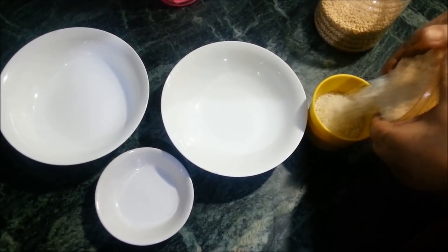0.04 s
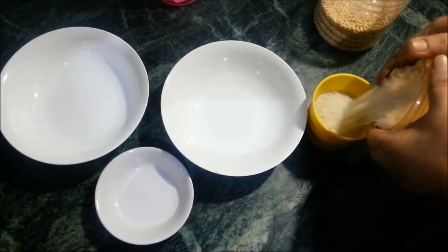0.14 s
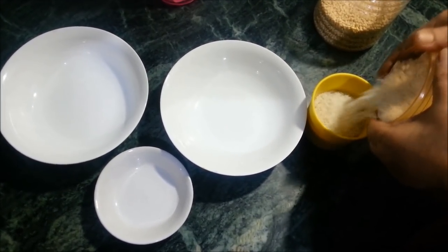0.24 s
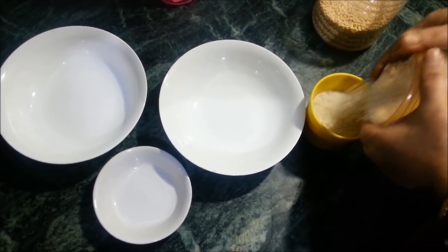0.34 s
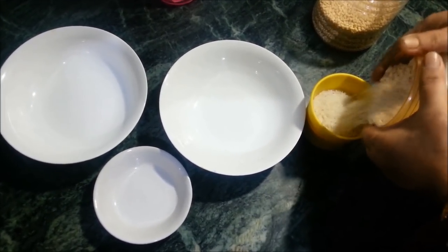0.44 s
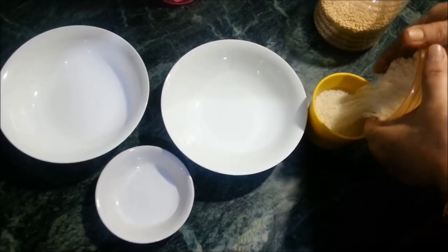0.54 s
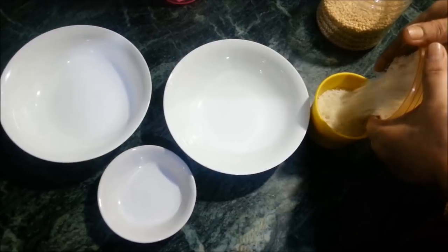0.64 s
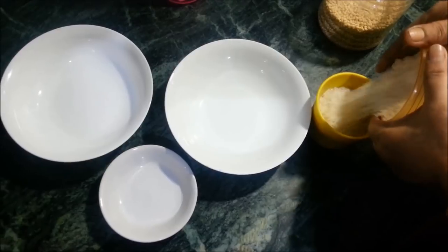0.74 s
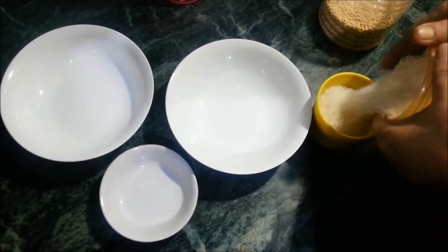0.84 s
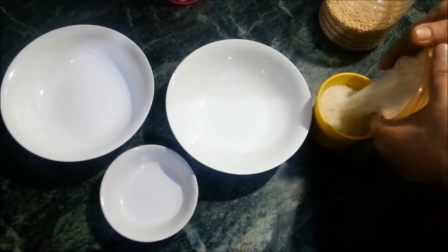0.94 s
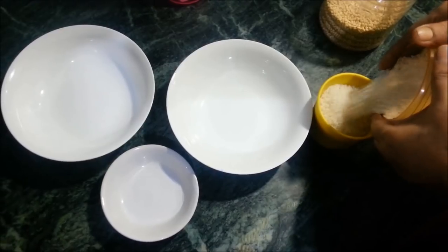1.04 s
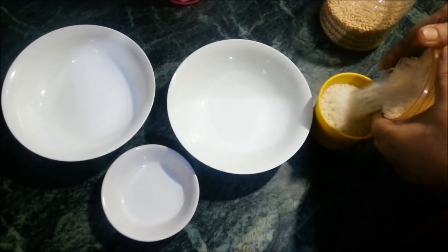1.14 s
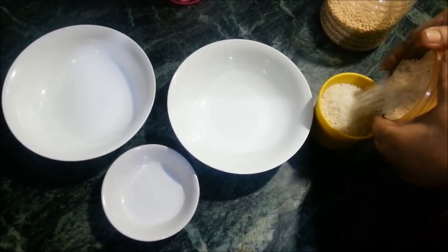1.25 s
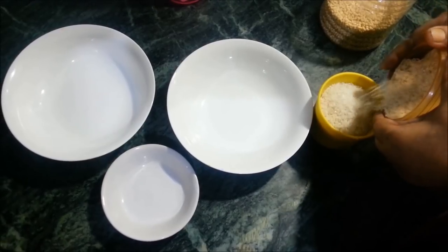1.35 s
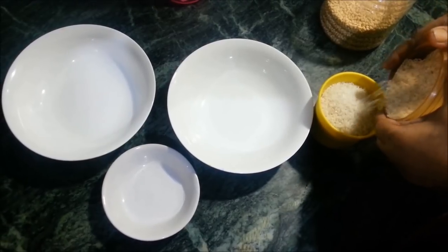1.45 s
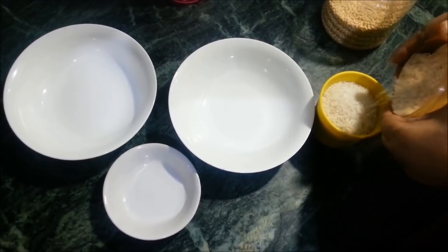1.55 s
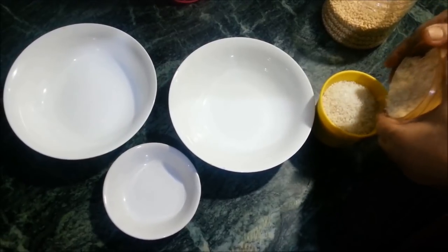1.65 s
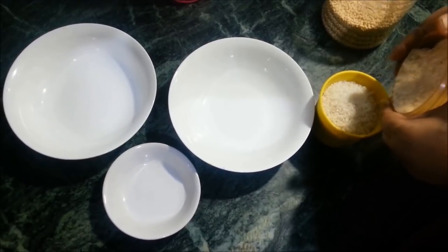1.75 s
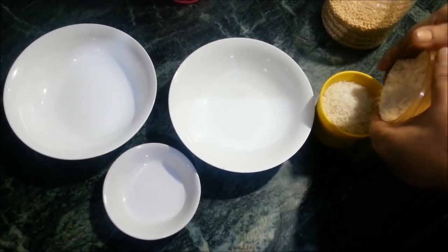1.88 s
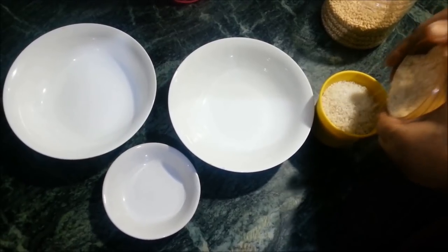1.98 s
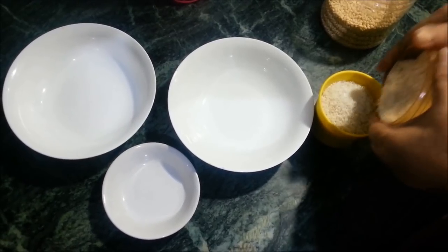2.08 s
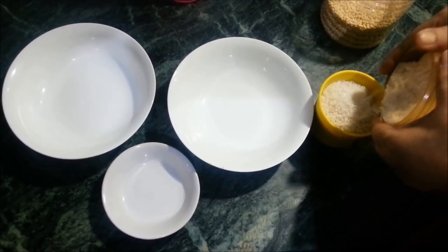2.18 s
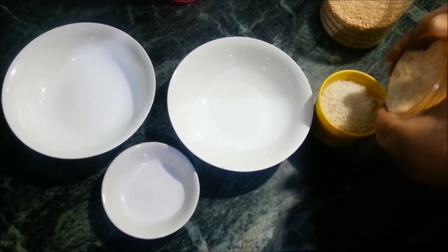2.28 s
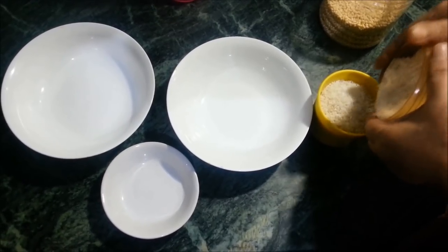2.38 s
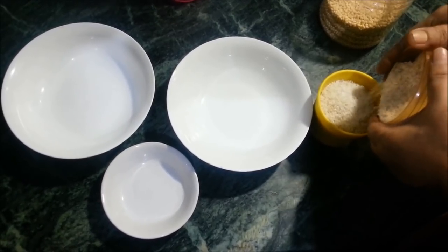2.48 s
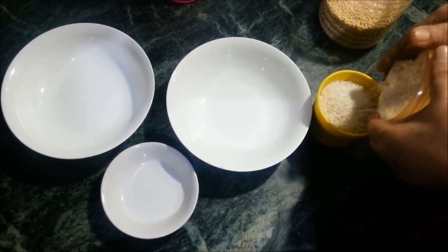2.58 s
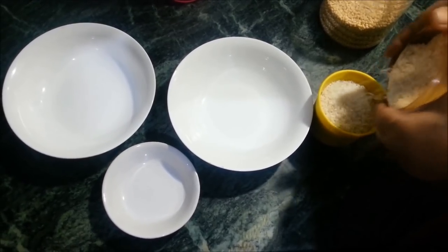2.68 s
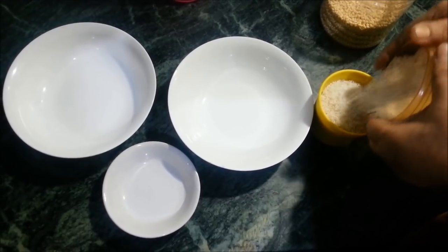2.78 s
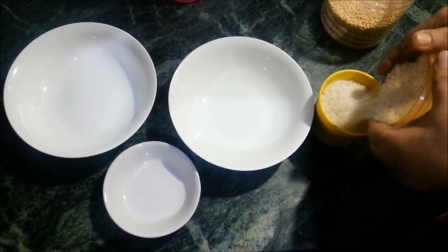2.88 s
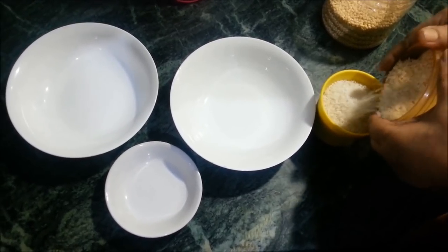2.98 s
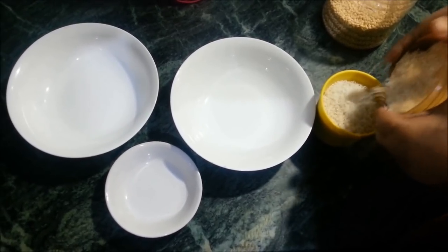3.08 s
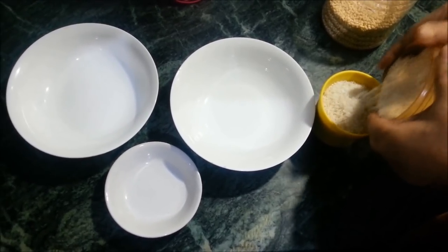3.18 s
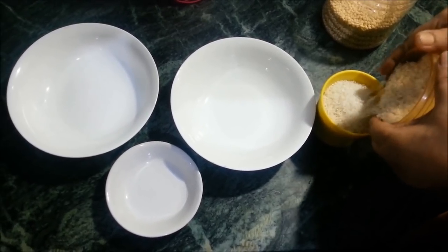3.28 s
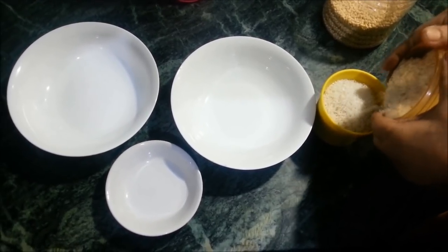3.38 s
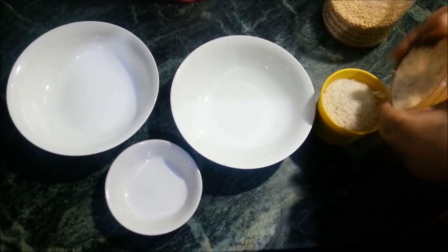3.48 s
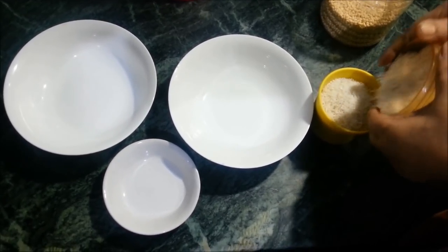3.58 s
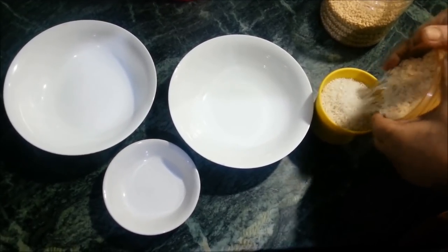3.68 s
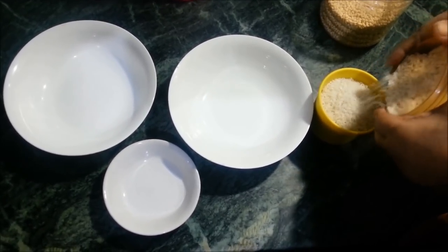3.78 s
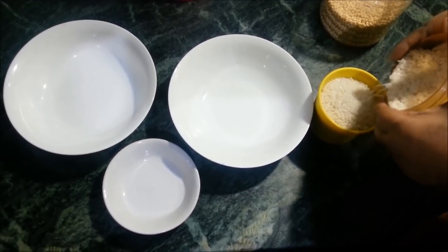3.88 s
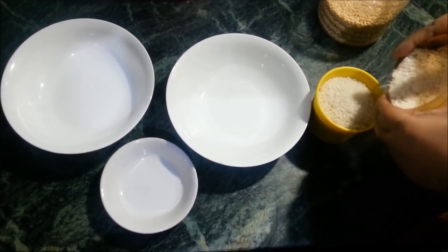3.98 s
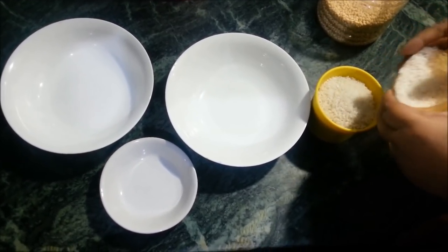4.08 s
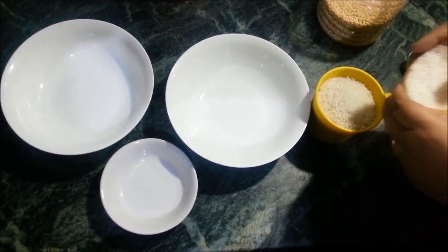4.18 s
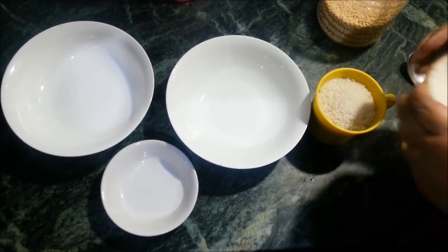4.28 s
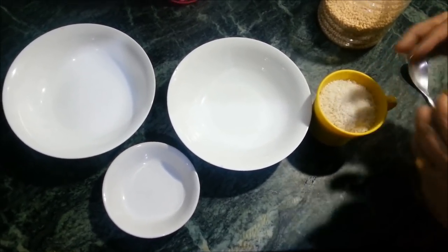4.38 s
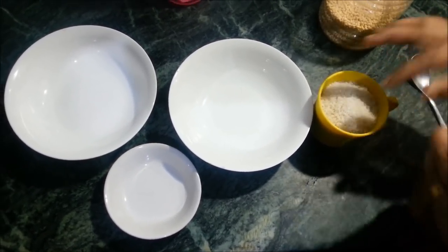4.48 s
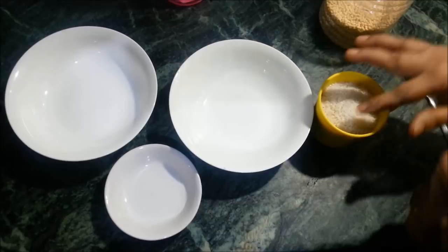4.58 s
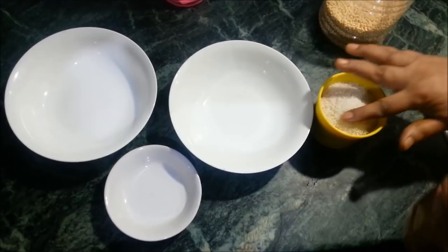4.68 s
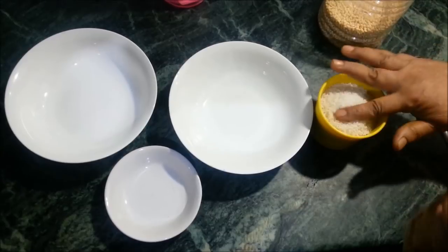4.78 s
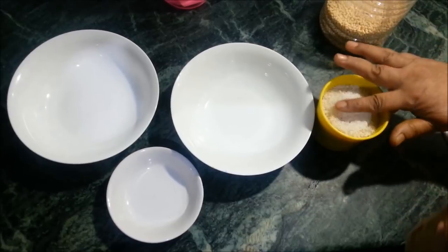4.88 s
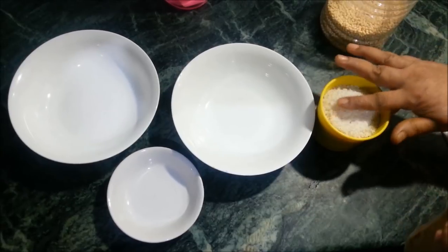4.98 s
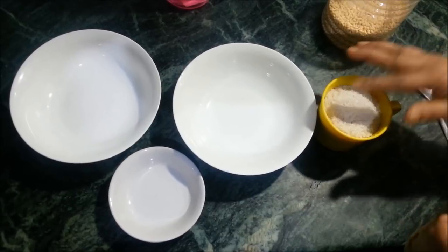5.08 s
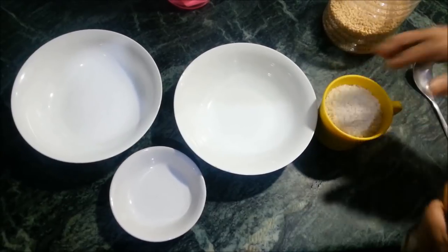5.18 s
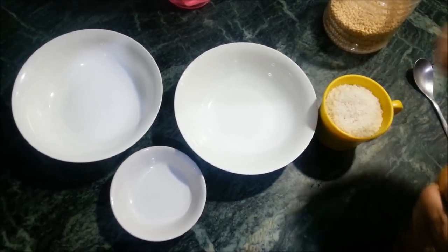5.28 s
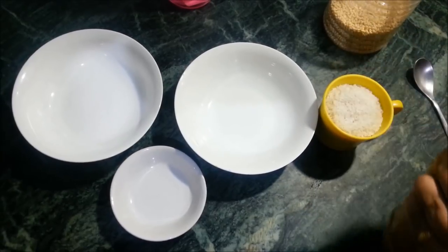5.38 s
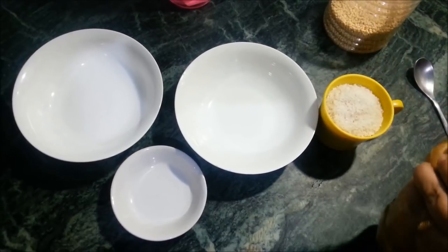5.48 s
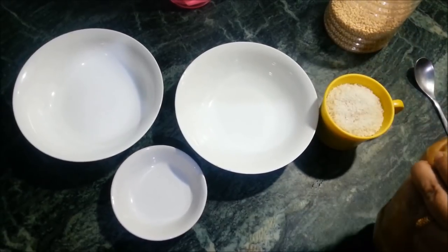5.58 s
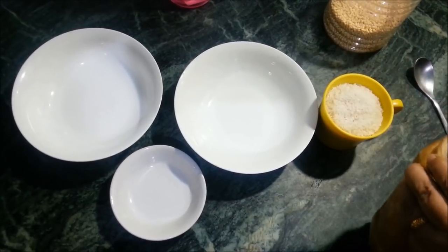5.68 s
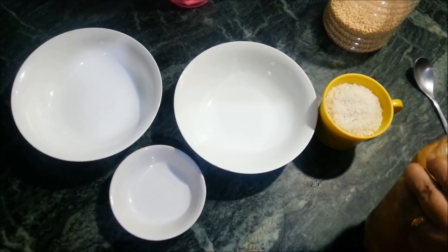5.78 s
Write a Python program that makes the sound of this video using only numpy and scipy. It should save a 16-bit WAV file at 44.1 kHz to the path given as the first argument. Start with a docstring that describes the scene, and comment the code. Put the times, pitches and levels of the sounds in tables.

```python
"""Dry rice pours from a plastic jar into a small plastic cup on a stone kitchen counter, and the cup rings.
Within two seconds the stream thins to single grains, and rice slips along the wall of the tilted jar.
Three shakes top the cup up; the jar is put aside, fingers level the heap, and the jar is moved again.
Each rice sound is a superposition of tiny impacts, coloured by the body they excite.
All is heard from close by, over the murmur and low hum of a small room."""
import sys
import numpy as np
from scipy import signal
from scipy.fft import rfft, irfft
from scipy.io import wavfile
from scipy.ndimage import uniform_filter1d

SR = 44100
rng = np.random.default_rng(int(sys.argv[2]) if len(sys.argv) > 2 else 0)


def unload_audio(sound):
    """Save the sound as a 16-bit wav file, at the path given as the first command line argument."""
    columns = np.transpose(np.atleast_2d(sound))
    # keep every value between -1 and 1, then stretch to whole-number steps
    steps = np.round(np.clip(columns, -1, 1) * 32767)
    wavfile.write(sys.argv[1], SR, steps.astype(np.int16))


N = 257544
T = np.arange(N) / SR

# Spectrum of the room's murmur. Each row: frequency in Hz, relative density in dB.
MURMUR_SPECTRUM = [(20, -14), (45, -37), (62, -9), (80, -20.5), (110, -7), (160, -13), (250, -6.5),
                   (380, -11), (480, -16), (750, -20), (1500, -27), (4000, -31), (7000, -34.5),
                   (15000, -38)]
# Low room resonances. Each row: frequency in Hz, bandwidth in Hz, level against the murmur in dB.
ROOM_MODES = [(109.3, 17, -8), (204.5, 10.5, -9.5), (292.9, 15.2, -3.5), (351.2, 11.4, -9)]
# Brief dips of the murmur. Each row: centre in seconds, change in dB, half length in seconds.
MURMUR_DIPS = [(1.88, -5, 0.15), (2.9, -1.5, 0.49), (4.11, -3.5, 0.29), (5.38, -6, 0.17)]
# Swells of the hum. Each row: centre in seconds, level in dB, half length in seconds.
HUM_SWELLS = [(0.163, -42.5, 0.19), (1.483, -48, 0.17), (2.193, -50.5, 0.09), (2.858, -57, 0.12),
              (3.666, -47.5, 0.09), (4.698, -46, 0.11), (5.77, -46.5, 0.091)]

# Spectra of the impacts. Each row: frequency in Hz, relative density in dB.
JAR_BODY_SPECTRUM = [(120, -6.5), (280, 1.5), (450, 3.5), (700, 2), (1300, 2), (2400, -22), (3500, -1.5),
                     (6000, -24.5), (14000, -54)]  # the jar's dull body
JAR_WALL_SPECTRUM = [(400, -11), (800, -5.5), (1300, -8.5), (1850, -7), (2450, 0), (3100, -4.5), (5000, 1),
                     (6000, 3), (7000, 3), (9000, -4), (11500, -4.5), (14500, -14.5)]  # rice on the jar wall
SHAKE_SPECTRUM = [(300, -31.5), (700, -34.5), (1300, -29.5), (2000, -23), (3000, -14.5), (4200, -10.5),
                  (5300, -3), (6600, -1.5), (8000, -3), (10000, -8), (14500, -18.5)]  # shaken rice
HEAP_SPECTRUM = [(400, -15), (900, -15), (1700, -17), (2800, -11), (4000, -7.5), (5600, -4.5), (6500, -2.5),
                 (7050, -2), (7700, -5.5), (8800, -14), (11500, -16), (14500, -27)]  # the stirred heap
GRAIN_SPECTRUM = [(500, -36), (3000, -27), (5000, -15.5), (6200, -5), (7000, 5.5), (7800, -0.5), (8500, 1),
                  (10000, -3.5), (11800, -3), (14500, -15)]  # one grain on plastic
CUP_SPECTRUM = [(400, -12.5), (1000, -14), (1900, -16), (3200, -15), (4600, -6.5), (6000, -4), (6950, -2),
                (7800, -3), (8550, -3.5), (9700, -6), (11200, -4.5), (14500, -11.5)]  # the stream in the cup

# Event levels below are relative: each source applies its own gain.
# Slips along the jar wall at each tilt. Each row: start in seconds, rise in seconds, level in dB,
# 60 dB decay time in seconds, treble weight in dB, thud level in dB.
WALL_SLIPS = [(1.699, 0.018, -51.5, 0.28, -6, -57.5), (1.814, 0.04, -52, 0.1, -3.5, -55),
              (1.955, 0.05, -55.5, 0.14, 6, -62.5), (2.118, 0.011, -49.5, 0.71, -0.5, -49),
              (2.18, 0.029, -59.5, 1.5, 6, -68), (2.351, 0.1, -50, 0.7, -5.5, -56),
              (2.57, 0.051, -61, 1.5, 9, -63), (3.36, 0.17, -57.5, 2.5, 10, -59),
              (4.065, 0.017, -53, 0.24, -1, -54.5), (4.13, 0.19, -66, 1.1, 6.5, -68)]
# Rice stirred in bulk: jar lifted and put aside, heap levelled, jar moved twice.
# Each row: start in seconds, rise in seconds, level in dB, 60 dB decay time in seconds.
STIRRINGS = [(4.255, 0.025, -48.5, 0.73), (4.33, 0.12, -38.5, 0.28), (4.479, 0.38, -33.5, 0.68),
             (5.604, 0.022, -35, 0.96), (5.731, 0.098, -31.5, 0.73)]
# The sharpest snaps within the stirred mass. Each row: time in seconds, level in dB.
HEAP_SNAPS = [(4.863, -28.5), (4.876, -28), (4.9095, -31), (4.950, -27.5), (5.0415, -40), (5.0665, -35.5),
              (5.1255, -38), (5.7385, -25), (5.7705, -25.5)]
# Shakes of the jar. Each row: start, onset of the rush and landing in seconds, rush level in dB,
# rustle and settling against the rush in dB, 60 dB settling time in seconds, thud level in dB.
JAR_SHAKES = [(2.776, 2.824, 2.850, -16.5, -18, -9.5, 0.45, -43),
              (3.244, 3.256, 3.275, -22, -18.5, -9.5, 0.45, -56.5),
              (3.61, 3.641, 3.667, -17, -15, -6, 0.44, -50.5)]
# Clumps striking the jar wall. Each row: time in seconds, level in dB.
CLUMP_HITS = [(2.8395, -15), (2.849, -15), (3.2715, -19), (3.2745, -18), (3.653, -14), (3.6655, -13)]
# The hardest single grains bouncing on the cup. Each row: time in seconds, level in dB.
GRAIN_HITS = [(.047, -26), (.077, -36), (.167, -27), (0.237, -27), (0.423, -34), (0.4666, -28),
              (.5645, -28.5), (.624, -35), (0.6555, -26.5), (0.7346, -31.5), (1.331, -32), (1.366, -35),
              (1.438, -33), (1.5392, -34), (1.6937, -42), (1.725, -41.5), (2.001, -37.5), (2.263, -40),
              (2.3559, -36.5), (2.3992, -34.5), (2.589, -31.5), (2.6628, -36), (2.985, -28), (3.0023, -26),
              (3.5448, -36.5), (3.555, -42), (4.2594, -43)]
# Flow into the cup, swelling once and running dry. Each row: time in seconds, level in dB.
STREAM_FLOW = [(0, -44), (0.75, -40), (0.89, -35.5), (1.25, -39.5), (1.68, -47.5), (1.8, -58)]
# Extra rice tumbling over the jar's lip. Each row: start in seconds, level in dB.
LIP_GUSHES = [(-0.045, -35.5), (0.156, -34), (0.411, -36), (2.933, -36), (3.801, -43)]
# Cup resonances that come and go as the heap rises. Each row: frequency in Hz, bandwidth in Hz,
# gain of the added ring in dB, strongest moment in seconds, half length in seconds.
CUP_MODES = [(6950, 240, 3.5, 0.059, 0.97), (8450, 220, 4, 0.27, 0.86), (8600, 740, 2, 0.95, 0.12)]
# Imbalance of the two microphones. Each row: frequency in Hz, left minus right in dB.
MIC_IMBALANCE = [(100, 0), (380, -3.5), (1300, -1.5), (2400, 0), (4600, -5), (6800, 7.5), (8500, 5.5),
                 (11000, 1), (15000, 4)]


def amp(db):
    """Amplitude ratio of a level in decibels."""
    return 10 ** (np.asarray(db) / 20)


def curve(rows):
    """Gain interpolated in decibels, decaying exponentially beyond its ends."""
    s, db = np.transpose(rows)
    outside = np.maximum(s[0] - T, 0) + np.maximum(T - s[-1], 0)
    return amp(np.interp(T, s, db)) * np.exp(-outside / 0.011)


def bell(centre_s, half_s):
    """Gaussian envelope, down to 1/e at half_s from its centre."""
    return np.exp(-((T - centre_s) / half_s) ** 2)


def swell(start, rise_s, db, t60, build=1):
    """Envelope of rice set moving: a power-law rise, then exponential decay."""
    after = np.maximum(T - start - rise_s, 0)
    return np.clip((T - start) / rise_s, 0, 1) ** build * amp(db - 60 * after / t60)


def waver(rate):
    """Slow random modulation: ramps between rate values a second, with a spread near 1."""
    held = int(SR / rate)
    steps = np.repeat(rng.standard_normal(N // held + 1), held)
    return uniform_filter1d(steps, held)[:N]


def convolve(x, h):
    """Linear filtering of each channel by a causal impulse response."""
    return signal.oaconvolve(np.atleast_2d(x), np.atleast_2d(h), axes=1)[:, :N]


def response(points, size=1024):
    """Minimum-phase impulse response of a (Hz, dB) spectrum, by folding the cepstrum."""
    hz, db = np.transpose(points)
    log_hz = np.log(np.fft.rfftfreq(size, 1 / SR) + 1)
    magnitude = amp(np.interp(log_hz, np.log(hz), db))
    cepstrum = irfft(np.log(magnitude))
    cepstrum[1:size // 2] *= 2
    cepstrum[size // 2 + 1:] = 0
    return irfft(np.exp(rfft(cepstrum)))


def colour(x, points, size=1024):
    """Source and filter: white excitation takes on a body's spectrum at unchanged power."""
    h = response(points, size=size)
    return convolve(x, h / np.linalg.norm(h))


def resonate(x, hz, width_hz):
    """Forced response of one damped mode."""
    return signal.lfilter(*signal.iirpeak(hz, hz / width_hz, fs=SR), x)


def impact(ring_s, scatter_db=-17):
    """Stereo impulse response of a contact, of unit energy: a brief burst, then scatter from walls."""
    t = np.arange(1024) / SR
    ring = t / ring_s * np.exp(1 - t / ring_s)
    scatter = amp(scatter_db) * np.exp(-t / .004)
    h = rng.standard_normal((2, len(t))) * (ring + scatter)
    return h / np.linalg.norm(h, axis=1, keepdims=True)


def swarm(gain, rate, spread_db, count=16):
    """Shot noise of rms gain on count spots: stronger flow brings more hits, up to rate a second."""
    chance = np.clip(rate / SR * gain / gain.max(), 1e-3, 1)
    size = amp(spread_db * np.clip(rng.standard_normal(N), -2, 2))
    impulses = (rng.random(N) < chance) * rng.choice([-1, 1], N)
    hits = impulses * size / np.sqrt(np.mean(size ** 2) * chance) * gain
    spot = rng.integers(count, size=N)
    contacts = [impact(ring_s=.0003) for _ in range(count)]
    return sum(convolve(hits * (spot == k), h) for k, h in enumerate(contacts))


def strikes(rows):
    """Isolated transients; each level is that of the energy spread over one millisecond."""
    out = np.zeros((2, N))
    for s, db in rows:
        start = int(s * SR)
        h = impact(ring_s=.00045)[:, :N - start]
        out[:, start:start + h.shape[1]] += h * amp(db) * np.sqrt(SR / 1000)
    return out


def room_murmur(level_db=-51.5):
    """Noise and randomly driven room modes; long waves reach both microphones nearly alike."""
    mid, side = colour(rng.standard_normal((2, N)), MURMUR_SPECTRUM, size=4096)
    side = convolve(side, response([(30, -20.5), (80, -8), (280, -10.0), (600, -4.5), (1200, 1)]))
    air = mid + side * np.array([[1], [-1]])
    for hz, width_hz, db in ROOM_MODES:
        mode = resonate(rng.standard_normal(N), hz, width_hz)
        air = air + mode / mode.std() * amp(db + 4.0 * waver(rate=11))
    dip_db = sum(db * bell(s, half_s) for s, db, half_s in MURMUR_DIPS)
    return air * amp(level_db + dip_db)


def low_hum(hz=95, rest_db=-59):
    """An amplitude-modulated pure tone, whose swells add in power to a steady floor."""
    swells = sum(amp(db) * bell(s, half_s) for s, db, half_s in HUM_SWELLS)
    return np.sin(2 * np.pi * hz * T) * np.hypot(swells, amp(rest_db))


def kitchen_reverb(x, t60=0.33, wet_db=-9, gap_s=0.0037):
    """Reverberation: hard walls follow the direct sound with a bright, exponentially decaying tail."""
    t = T[:SR // 2]
    tail = rng.standard_normal((2, len(t))) * amp(-60 * t / t60) * (t > gap_s)
    return x + amp(wet_db) * convolve(x, tail / np.linalg.norm(tail, axis=1, keepdims=True))


def jar_thuds(decay_s=0.026):
    """Damped vibration: at each slip and shake the rice shifts as one mass against the hand-held jar."""
    thuds = [(s + rise_s, db) for s, rise_s, *_, db in WALL_SLIPS]
    thuds += [(s, db) for start, rush_s, *_, db in JAR_SHAKES for s in (start, rush_s)]
    push = sum(amp(db) * (T > s) * np.exp(-np.maximum(T - s, 0) / decay_s) for s, db in thuds)
    return colour(swarm(push, rate=6000, spread_db=3.0, count=6), JAR_BODY_SPECTRUM) * amp(5)


def slip_envelopes():
    """Rise and decay of each slip along the jar wall."""
    return [swell(s, rise_s, db, t60, build=0.72) for s, rise_s, db, t60, _, _ in WALL_SLIPS]


def sliding_rice():
    """Sliding friction: grains creep over the jar wall, duller when the mass moves as one."""
    slips = slip_envelopes()
    motion = sum(slips)
    treble = sum(slip * amp(db) for slip, (*_, db, _) in zip(slips, WALL_SLIPS))
    treble_weight = (treble + 1e-9) / (motion + 1e-9)
    rustle = colour(swarm(motion, rate=5000, spread_db=1.0), JAR_WALL_SPECTRUM)
    low = signal.sosfiltfilt(signal.butter(2, 6000, fs=SR, output="sos"), rustle)
    return low * amp(8.5) + (rustle - low) * treble_weight * amp(6.0)


def flutter(depth_db=1.5):
    """Amplitude modulation by the unevenness of granular flow."""
    return amp(depth_db * waver(rate=40))


def stirred_rice():
    """Friction between grains gives a dense, soft hiss; sharper snaps carry less of the low body."""
    motion = sum(swell(*row, build=0.92) for row in STIRRINGS) * flutter()
    snaps = strikes(HEAP_SNAPS) + swarm(motion, rate=94, spread_db=2.5, count=4) * amp(-10)
    crunches = convolve(snaps, response([(3000, -5), (5500, -2), (7000, 4.5), (12000, 4)]))
    hiss = swarm(motion, rate=9000, spread_db=0.5) * amp(1.3)
    return colour(hiss + crunches, HEAP_SPECTRUM)


def shaken_rice():
    """Inertia: the rice rustles, rushes on until it collides with the jar wall, then settles."""
    rustle, rush, settle = np.zeros((3, N))
    for start, rush_s, land_s, db, rustle_db, settle_db, t60, _ in JAR_SHAKES:
        speed = np.clip((T - rush_s) / (land_s - rush_s), 0, 1)
        after = np.maximum(T - land_s, 0)
        lead_in = np.exp(np.minimum(T - rush_s, 0) / 0.091)
        rustle += amp(db + rustle_db) * (T > start) * (T <= land_s) * lead_in
        rush += amp(db) * speed ** .4 * np.exp(-after / 0.004)
        settle += amp(db + settle_db - 60 * after / t60) * (T > land_s)
    rushing = swarm(rush, rate=14000, spread_db=2.0) * amp(2.0)
    bright = colour(rushing + strikes(CLUMP_HITS), SHAKE_SPECTRUM)
    settling = colour(swarm(settle, rate=14000, spread_db=3), SHAKE_SPECTRUM)
    dull = convolve(settling, response([(700, 18), (2500, 7.5), (6500, 1.0), (11000, -0.5)]))
    rustling = colour(swarm(rustle, rate=4300, spread_db=5.5, count=8), JAR_WALL_SPECTRUM)
    return bright + dull + rustling * amp(-0.5)


def flow_envelope():
    """Incoherent addition: the stream and its gushes sum in power, and flutter as clumps break off."""
    gush_power = sum(swell(s, rise_s=0.07, db=db, t60=0.9) ** 2 for s, db in LIP_GUSHES)
    return np.sqrt(curve(STREAM_FLOW) ** 2 + gush_power) * flutter()


def bouncing_grains(rebound_s=0.0057, rebound_db=-6):
    """Inelastic rebound: hard grains tick twice on the rim; lighter, random hits follow the flow."""
    delays = rebound_s * rng.uniform(.5, 2, len(GRAIN_HITS))
    rebounds = [(s + delay, db + rebound_db) for (s, db), delay in zip(GRAIN_HITS, delays)]
    motion = flow_envelope() + sum(slip_envelopes())
    loose = swarm(motion, rate=52, spread_db=9, count=4) * amp(-14)
    return colour(strikes(GRAIN_HITS + rebounds) + loose, GRAIN_SPECTRUM) * amp(4)


def pouring_rice():
    """Resonance: many soft impacts on the heap and fewer hard ones on the wall drive the cup's modes."""
    flow = flow_envelope()
    soft = colour(swarm(flow, rate=9100, spread_db=2.0), CUP_SPECTRUM) * amp(-1.0)
    hard = colour(swarm(flow, rate=730, spread_db=7.5, count=8), GRAIN_SPECTRUM) * amp(-6.5)
    stream = soft + hard
    ringing = sum(resonate(stream, hz, width_hz) * amp(db) * bell(s, half_s)
                  for hz, width_hz, db, s, half_s in CUP_MODES)
    return stream + ringing


def pan(x, db):
    """Direction by level difference: the left channel is db louder than the right."""
    return x * amp(np.array([[db], [-db]]) / 2)


def scene():
    """Superposition: the rice sounds share one reverberant room, over its murmur and hum."""
    in_cup = pan(pouring_rice() + bouncing_grains(), db=0.2)
    in_jar = pan(sliding_rice() + jar_thuds(), db=-0.5) + shaken_rice()
    stirred = pan(stirred_rice(), db=1.0)
    return kitchen_reverb(in_cup + in_jar + stirred) + room_murmur() + low_hum()


def record(dry, cutoff_hz=14700):
    """Transduction: each microphone colours the sound, saturation rounds peaks, a low-pass cuts the top."""
    mics = [response([(hz, sign * db / 2) for hz, db in MIC_IMBALANCE]) for sign in (1, -1)]
    rounded = np.tanh(convolve(dry, mics))
    return signal.sosfilt(signal.ellip(10, .2, 80, cutoff_hz, fs=SR, output="sos"), rounded)


dry = scene()
out = record(dry)
unload_audio(out)
```